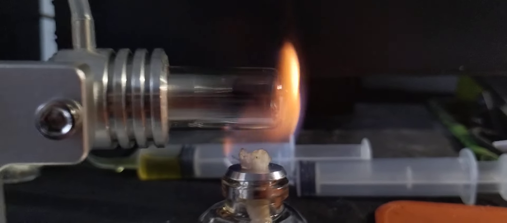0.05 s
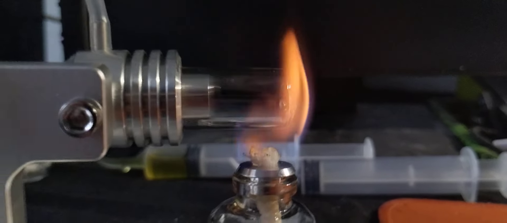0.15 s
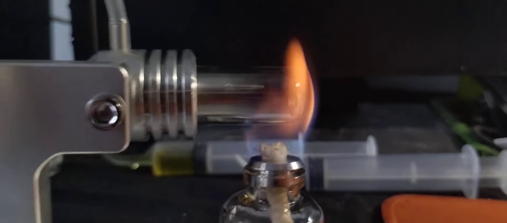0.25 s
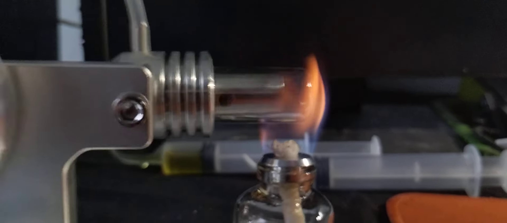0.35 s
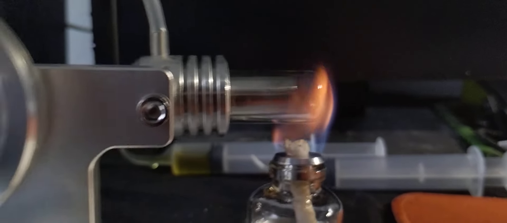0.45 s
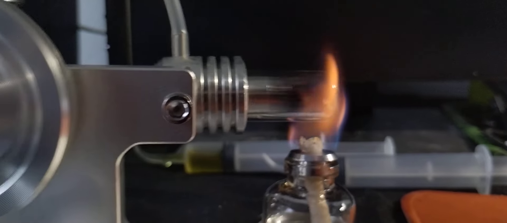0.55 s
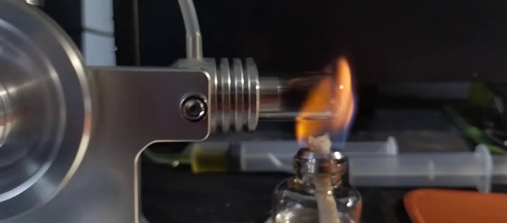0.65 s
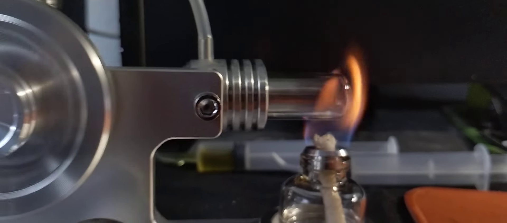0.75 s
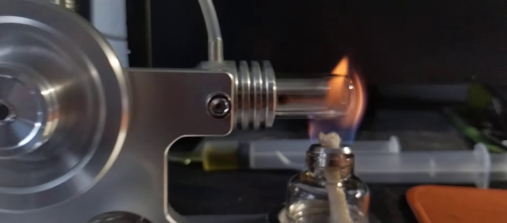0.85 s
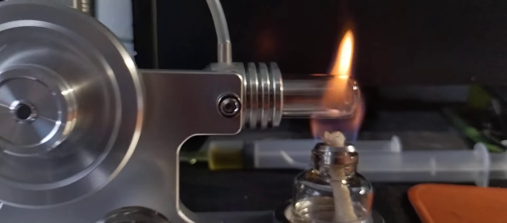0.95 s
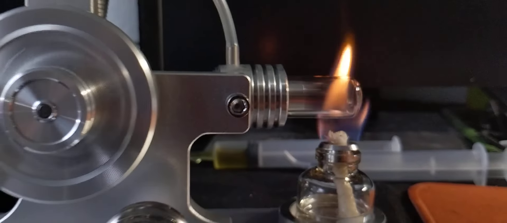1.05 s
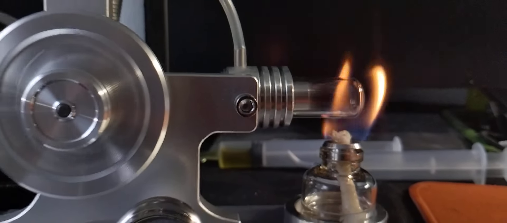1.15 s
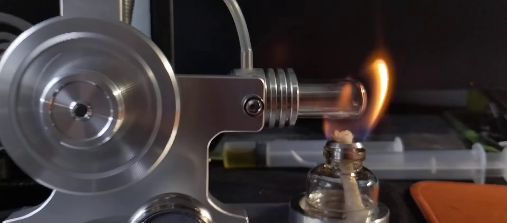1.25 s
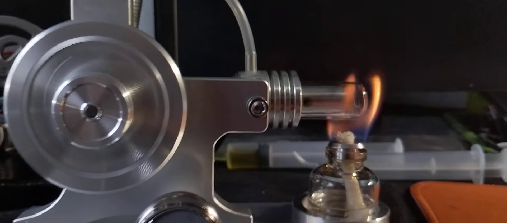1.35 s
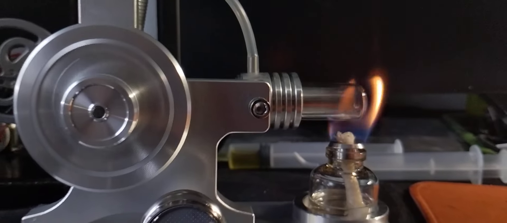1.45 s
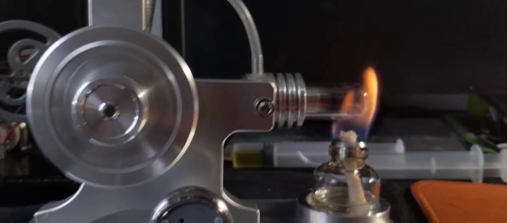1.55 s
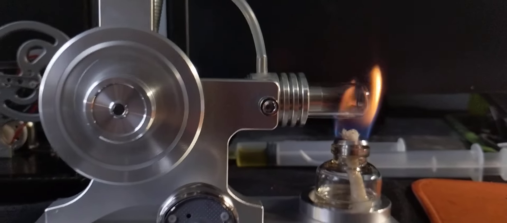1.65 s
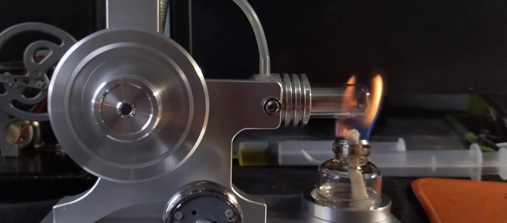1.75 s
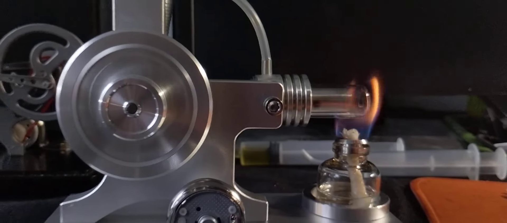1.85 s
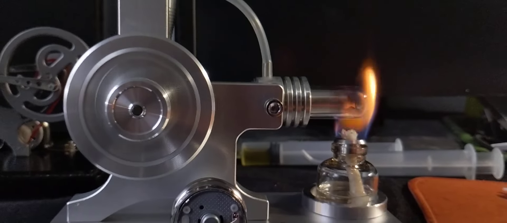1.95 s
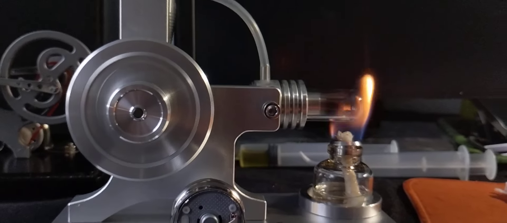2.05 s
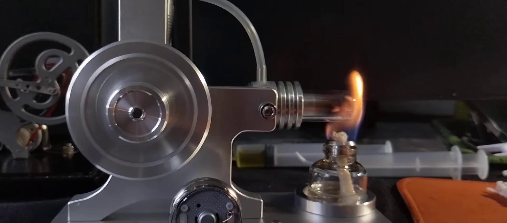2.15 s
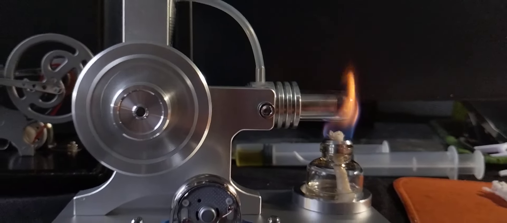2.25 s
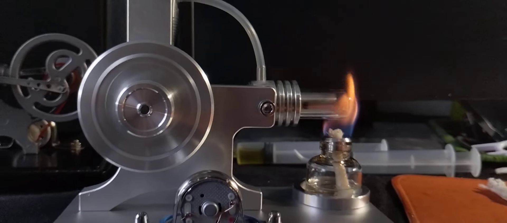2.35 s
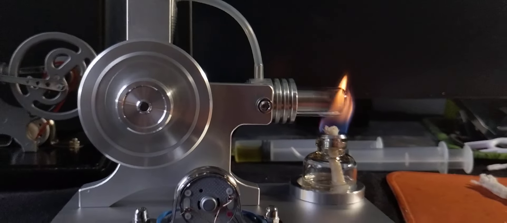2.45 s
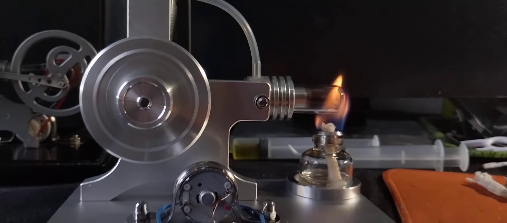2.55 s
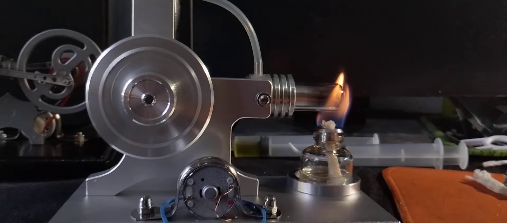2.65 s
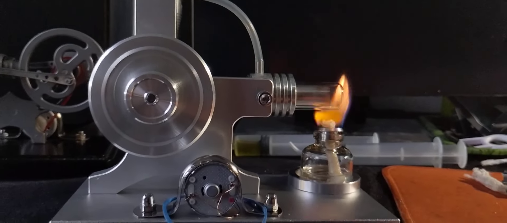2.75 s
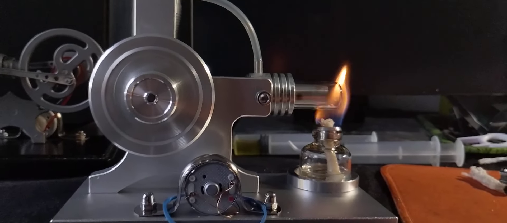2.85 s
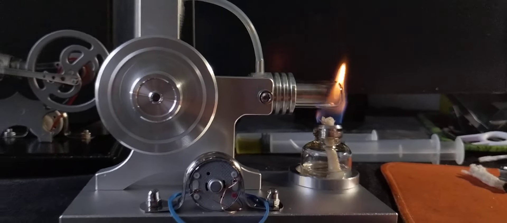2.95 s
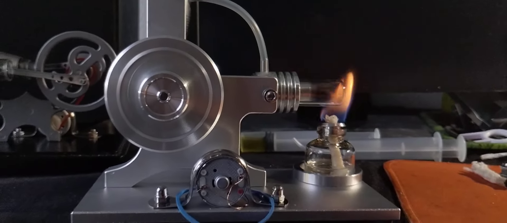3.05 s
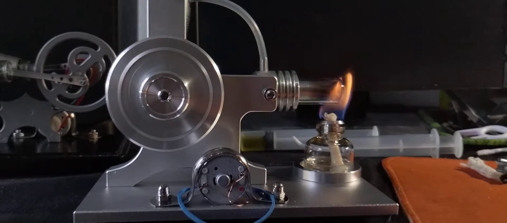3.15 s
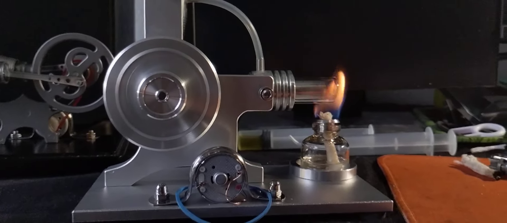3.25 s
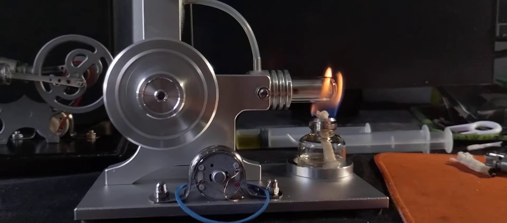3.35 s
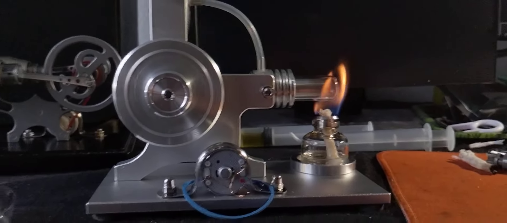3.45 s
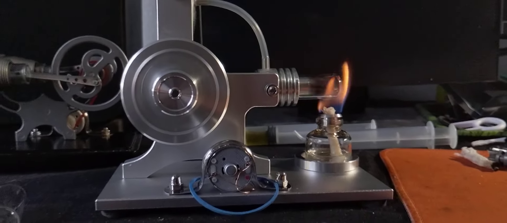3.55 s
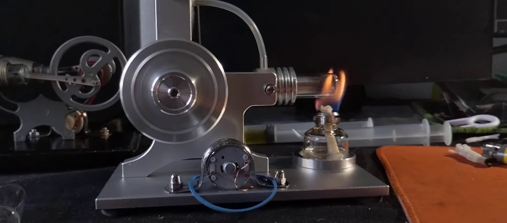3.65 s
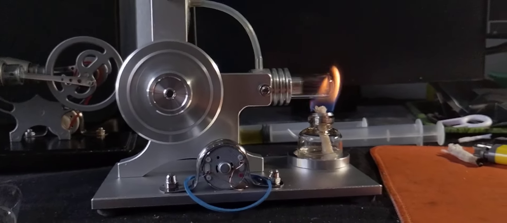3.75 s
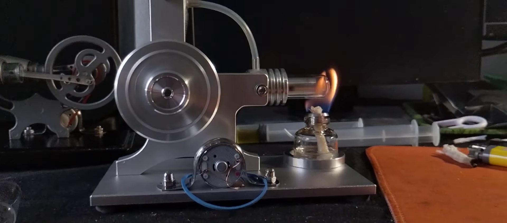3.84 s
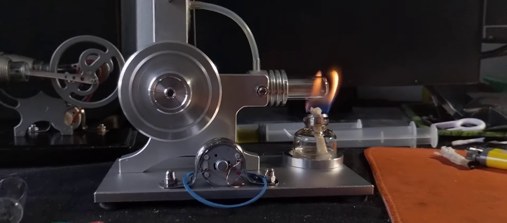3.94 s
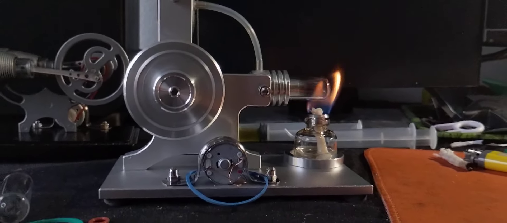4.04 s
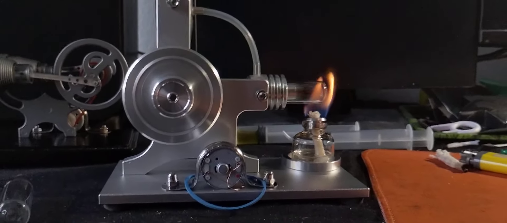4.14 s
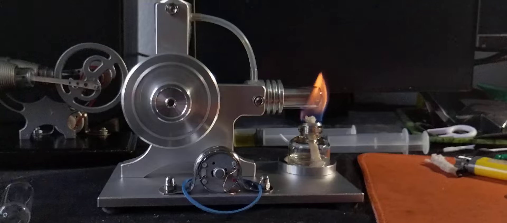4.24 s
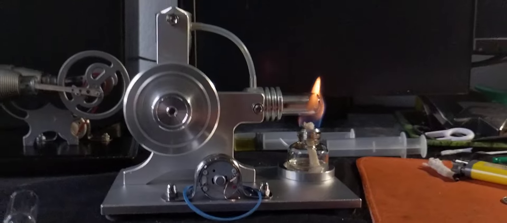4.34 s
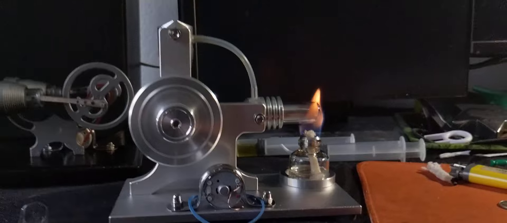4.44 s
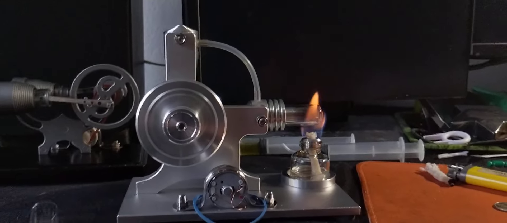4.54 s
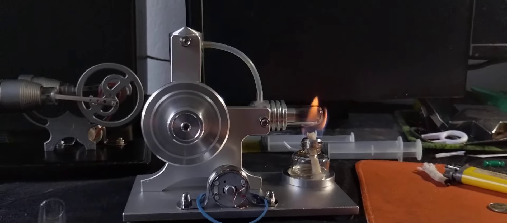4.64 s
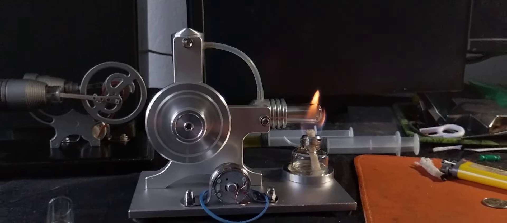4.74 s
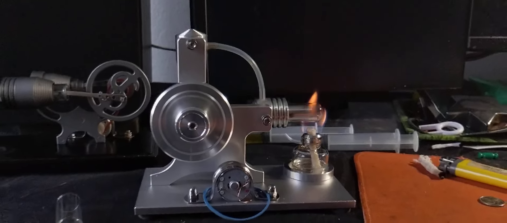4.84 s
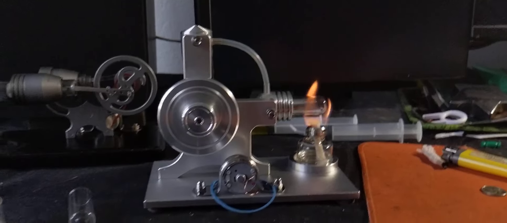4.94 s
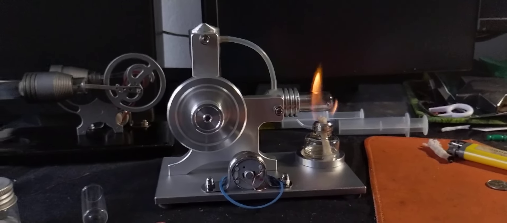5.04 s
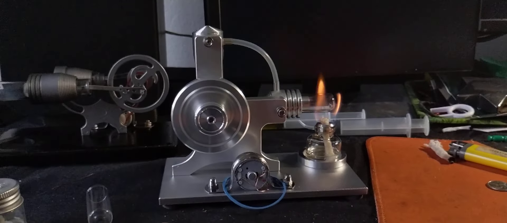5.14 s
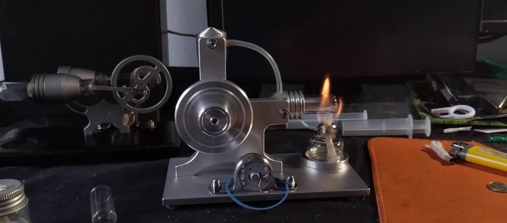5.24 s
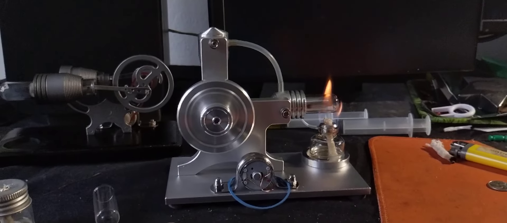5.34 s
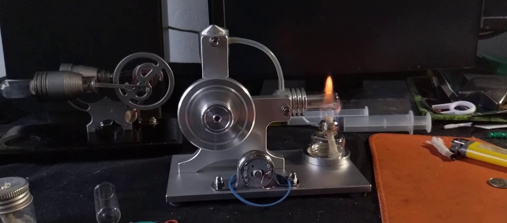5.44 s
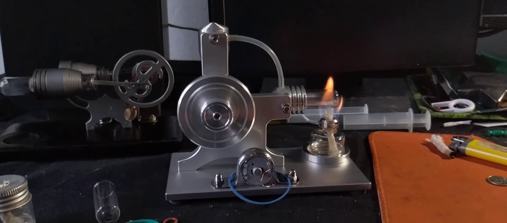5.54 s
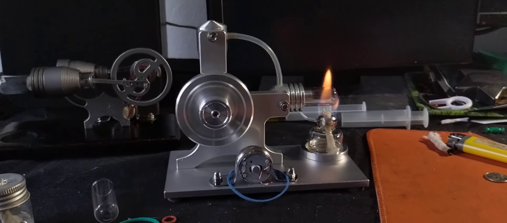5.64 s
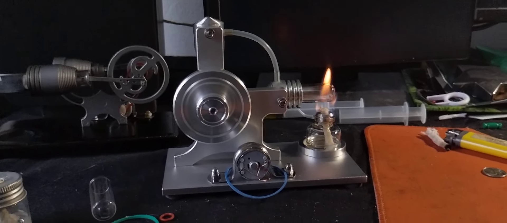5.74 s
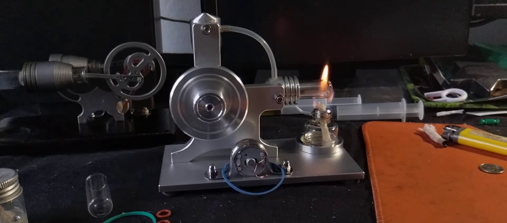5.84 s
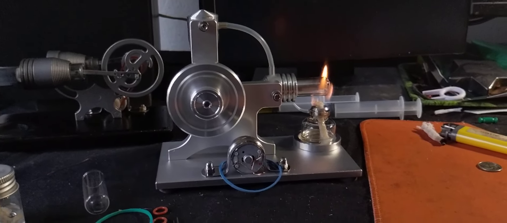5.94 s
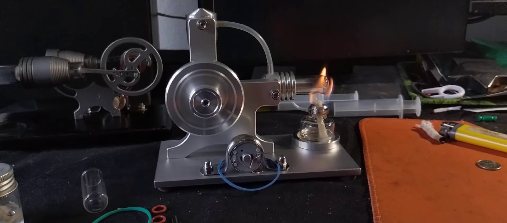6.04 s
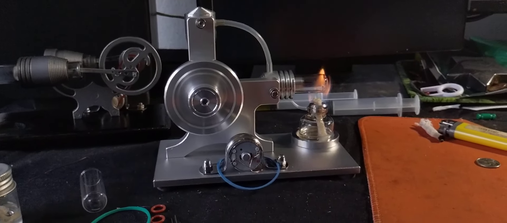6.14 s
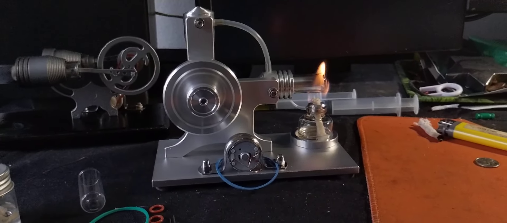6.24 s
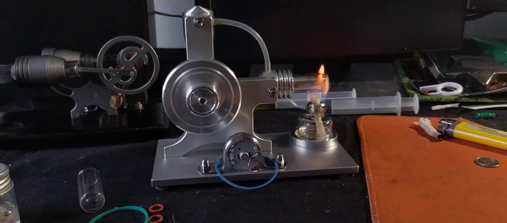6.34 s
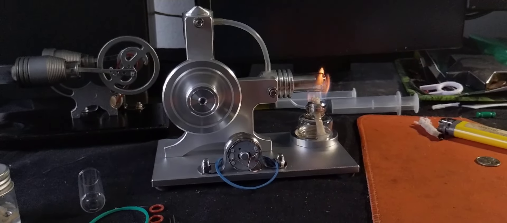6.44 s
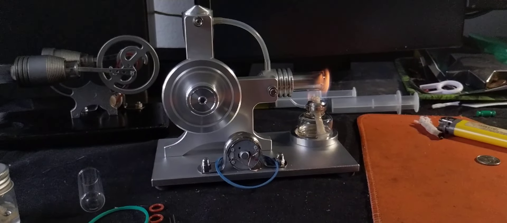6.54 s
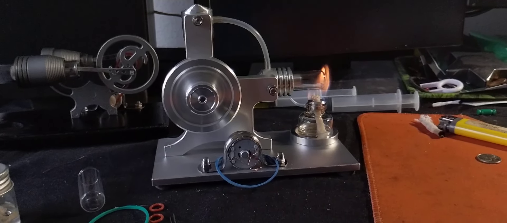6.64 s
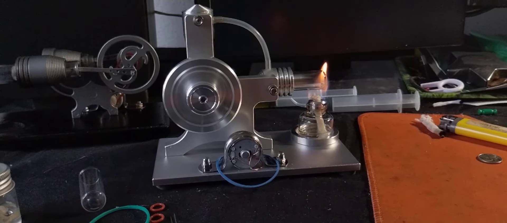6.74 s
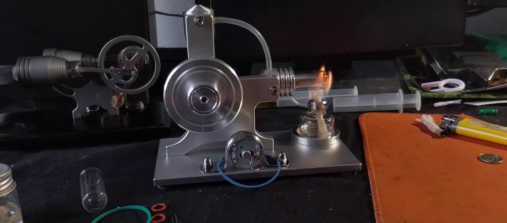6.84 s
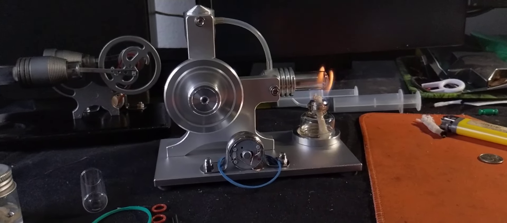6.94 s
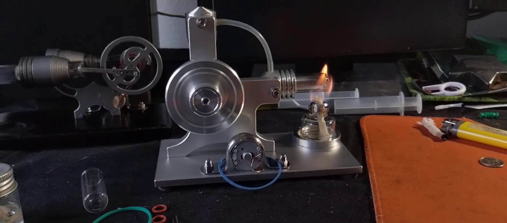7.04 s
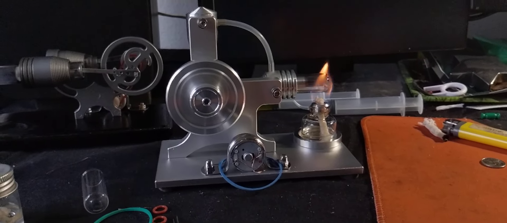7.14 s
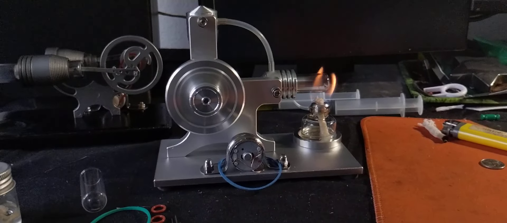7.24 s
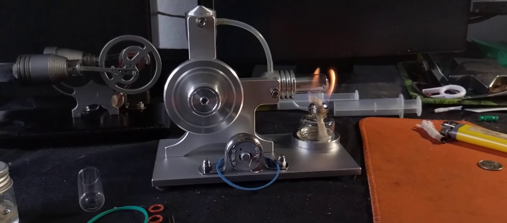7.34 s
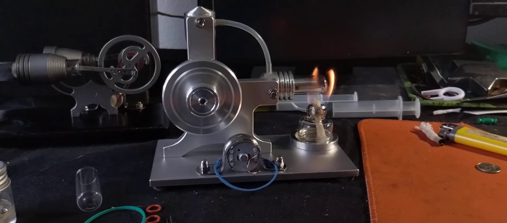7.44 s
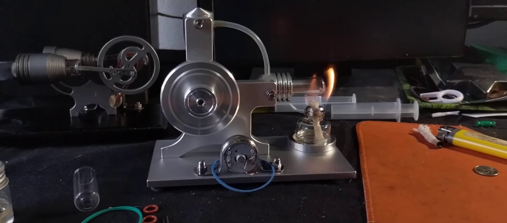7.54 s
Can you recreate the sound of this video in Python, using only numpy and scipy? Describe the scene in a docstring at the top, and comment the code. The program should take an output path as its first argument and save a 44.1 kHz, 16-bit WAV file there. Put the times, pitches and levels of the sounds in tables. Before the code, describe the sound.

Heard up close and to the left, a little hot-air engine runs at a constant quick pace, its metal parts ticking, scraping and ringing in a bright mechanical whir above a soft rumble. A few light slaps at the start lead to a brief spell of sharper rattling, then scattered clinks. As the microphone backs away in the small room, the running becomes a little quieter and more centred.

```python
"""A bench in a small room: a hot-air engine spins freely at 18 turns a second, while a pair of microphones
draws back from 12 to 34 cm. The play in its rods and pistons is taken up in a fixed pattern of knocks
every turn; they ring the metal frame, over sliding friction, the hum of the shaking base and a low rumble.
The rod slaps at first, and joints slam now and then, mostly in one rattling spell. The engine sits to
the left, and the right microphone is shaded from the treble."""
import sys
import numpy as np
from scipy import signal
from scipy.fft import rfft, irfft, next_fast_len
from scipy.io import wavfile
from scipy.ndimage import uniform_filter1d, minimum_filter1d, map_coordinates

SR = 44100
rng = np.random.default_rng(int(sys.argv[2]) if len(sys.argv) > 2 else 0)


def wrap_up_sound(samples):
    """Save the sound to the file named by the first command line argument, as 16-bit audio."""
    columns = np.atleast_2d(samples).T
    # keep every value between -1 and 1, then stretch to whole-number steps
    tamed = np.clip(columns, -1, 1)
    steps = np.round(tamed * 32767).astype(np.int16)
    wavfile.write(sys.argv[1], SR, steps)


N = 334719


def amp(db):
    """Decibels to gain."""
    return 10 ** (np.asarray(db) / 20)


def unit(x):
    """Scale to rms 1."""
    return x / np.sqrt(np.mean(x ** 2) + 1e-20)


def along(points, hz):
    """(Hz, value) points read on a log axis."""
    f, v = np.transpose(points)
    return np.interp(np.log(hz + 1), np.log(f + 1), v)


def curve(points):
    """(s, value) points read at every sample."""
    return np.interp(np.arange(N) / SR, *np.transpose(points))


def wobble(rate):
    """A smooth random curve, rate knots a second."""
    return map_coordinates(rng.standard_normal(int(N * rate / SR) + 4), [np.arange(N) * rate / SR])


def filtered(x, response):
    """x times a response of frequency."""
    n = x.shape[-1]
    m = next_fast_len(n + 8192, True)
    return irfft(rfft(x, m) * response(np.fft.rfftfreq(m, 1 / SR)), m)[..., :n]


def coloured(x, spectrum):
    """x with a broad colour, at rms 1."""
    return unit(filtered(x, lambda f: amp(along(spectrum, f))))


def rung(x, modes, order=1):
    """x through resonances (pitch_hz, width_hz, level_db), at rms 1; order 2 darkens the valleys."""
    def response(f):
        return sum((-1) ** k * amp(db) * 1j * f * width / (hz * hz - f * f + 1j * f * width)
                   for k, (hz, width, db) in enumerate(modes))
    return unit(filtered(x, lambda f: response(f) ** order))


def pair(alike, size=N):
    """White noise at two microphones that share a part of it."""
    shared = rng.standard_normal(size)
    return np.sqrt(alike) * shared + np.sqrt(1 - alike) * rng.standard_normal((2, size))


def panned(x, left_db):
    """Tip the balance to the left, keeping the sum."""
    share = 1 / (1 + amp(-left_db))
    return 2 * x * np.array([share, 1 - share]).reshape(2, -1)


# The microphones draw back from the engine, then all but rest: time_s, distance_m
MIC_PATH = [(0, .12), (.7, 0.13), (1.5, 0.16), (3, 0.22), (4.7, 0.32), (7.59, 0.34)]
def doublings(near_m=.12):
    """How many times the distance to the engine has doubled; called far below."""
    return np.log2(curve(MIC_PATH) / near_m)


def beamed(lobes, far, loss_db=7):
    """Level in dB of a strong mode: the microphones move through its lobes and lose it with distance."""
    return curve(lobes) - loss_db * far


# The flywheel's nearly steady speed: time_s, turns_per_s
FLYWHEEL_SPEED = [(0.0, 17.962), (1.0, 17.946), (2.0, 17.955), (2.8, 18.03), (3.8, 18.081), (4.5, 18.027),
                  (5.2, 18.045), (6.0, 18.073)]
def crank(start_turns=0.08106):
    """Turns of the flywheel so far."""
    return start_turns + np.cumsum(curve(FLYWHEEL_SPEED)) / SR


# The contacts of one turn and their relative force on each part: place_turns, scatter_turns, chatter_s,
# ping_db, thin_db, wheel_db, clack_db, frame_db, bracket_db, plate_db
TURN_KNOCKS = [(.048, .005, .0017, 0, 0, 0, -5, -3, -7, 0), (.115, .014, .003, -4, -7, -5, -4, -2, -8, -4),
               (.255, .02, .003, -11, -12, -15, -9, -10, -7, -11),
               (.33, .006, .002, -12, -8, -11, -10, -9, -12, -7),
               (.365, .012, .003, -12, -13, -12, -11, -8, -14, -8),
               (.51, .008, .002, -26, -20, -24, -20, -20, -7, -22),
               (.622, .005, .0017, -1, -6, -14, 0, 0, -8, -4),
               (.695, .016, .003, -5, -8, -9, -7, -7, -6, -6),
               (.835, .005, .0016, -1, -3, 0, -9, -5, -1, -7),
               (.87, .012, .0025, -14, -11, -12, -6, -1, -1, -7)]
def knock_power(turns, force_db=1.3, bright_db=1.6, rise_s=.0005):
    """Each contact comes once a turn, a little early or late, and chatters: power into seven parts."""
    power, t = np.zeros((7, N + SR)), np.arange(SR // 40) / SR
    whole = np.arange(int(turns[-1]) + 1)
    for place, scatter, chatter_s, *part_db in TURN_KNOCKS:
        late, hard, bright = np.clip(rng.standard_normal((3, len(whole))), -2, 2)
        starts = np.searchsorted(turns, whole + place + scatter * late)
        samples = (starts[:, None] + np.arange(len(t))).ravel()
        burst = (np.exp(-t / chatter_s) * (1 - np.exp(-t / rise_s))) ** 2
        burst /= burst.sum()
        train = lambda db: np.bincount(samples, np.outer(amp(db) ** 2, burst).ravel(), N + SR)
        # the ping depends more than the rest on how squarely the metal meets
        power[0] += amp(part_db[0]) ** 2 * train(force_db * hard + bright_db * bright)
        power[1:] += amp(part_db[1:])[:, None] ** 2 * train(force_db * hard)
    return power[:, :N] / power[:, :N].mean(axis=1, keepdims=True)


def drive(power, slide_db, alike):
    """Chattering contacts on top of steady sliding friction."""
    return np.sqrt(power + amp(slide_db) ** 2) * pair(alike)


def chime(power, hz, damping_hz, blur_hz, skirt_hz=420):
    """One clean mode, topped up by every knock: it dies away between knocks, and each nudges its phase."""
    energy = signal.lfilter([1], [1, -np.exp(-2 * np.pi * damping_hz / SR)], power)
    nudges = np.sqrt(2 * np.pi * blur_hz * power / SR) * rng.standard_normal(N)
    phase = 2 * np.pi * hz * np.arange(N) / SR + uniform_filter1d(np.cumsum(nudges), 40)
    mic_drift = np.array([wobble(14), wobble(14)])
    return rung(np.sqrt(energy) * np.sin(phase + mic_drift), [(hz, skirt_hz, 0)])


PING_HZ, CLACK_HZ, LINK_HZ, ROD_HZ = 8815, 4265, 3915, 3468

# The clack's lobes along the microphones' path: time_s, level_db
CLACK_LOBES = [(0, -47), (1, -40), (2, -35), (2.7, -35), (4.3, -35), (5.3, -40)]
# Resonances of the thin links: pitch_hz, width_hz, level_db
THIN_LINK_MODES = [(5463, 230, 5), (5920, 190, 1), (6250, 350, 2), (6960, 200, 0.5)]
# The colour of bare metal contact: pitch_hz, level_db
CONTACT_COLOUR = [(1500, -39), (2950, -15), (3300, -3.5), (3900, -5.5), (4400, -6), (4950, -6.5),
                  (5450, -2), (6000, -3.5), (6600, -8.5), (8000, -25), (11000, -30)]
def link_clatter(clack, ticks, scrape, far):
    """The joints clack, the thin links tick and bare metal scrapes."""
    level_db = -35 - 7 * far
    out = amp(beamed(CLACK_LOBES, far)) * chime(clack, CLACK_HZ, damping_hz=150, blur_hz=110)
    out += amp(level_db + 1.5) * rung(ticks, THIN_LINK_MODES)
    return out + amp(level_db - 3.5) * coloured(scrape, CONTACT_COLOUR)


# Lobes of the frame, link, wheel, post and treble modes along the microphones' path: time_s, level_db
FRAME_LOBES = [(0, -37), (.5, -37), (.95, -31), (1.8, -26.5), (2.2, -27), (3.3, -31.5), (4.5, -32.5),
               (7.59, -31)]
LINK_LOBES = [(0, -49), (.5, -39), (1.2, -38.5), (1.7, -40), (2.9, -34.5), (3.5, -35.5), (4.4, -37),
              (5.3, -50), (6.4, -47)]
WHEEL_LOBES = [(.3, -28.5), (1.9, -43), (2.6, -30), (4.7, -40.5), (7.59, -30)]
POST_LOBES = [(0, -39), (.5, -43), (1.8, -42.5), (3.3, -67), (4.6, -35), (5.2, -34.5), (7.59, -37)]
TREBLE_LOBES = [(0, -35), (.65, -26), (1.5, -37.5), (3, -37), (5.9, -48), (7.59, -32)]
# The metal's treble resonances: pitch_hz, width_hz, level_db
TREBLE_MODES = [(6710, 110, -8), (7450, 330, -5), (7830, 90, 3.5), (8540, 90, 4.5)]
def metal_rings(frame, clack, wheel, ticks, far):
    """The knocks ring the frame, link, wheel and post; each swells and fades as its lobes pass."""
    out = amp(beamed(FRAME_LOBES, far)) * chime(frame, hz=4462, damping_hz=60, blur_hz=48)
    out += amp(beamed(LINK_LOBES, far)) * chime(clack, LINK_HZ, damping_hz=190, blur_hz=150)
    out += amp(beamed(WHEEL_LOBES, far)) * chime(wheel, hz=6305, damping_hz=110, blur_hz=90)
    out += amp(beamed(TREBLE_LOBES, far)) * rung(ticks, TREBLE_MODES)
    return out + amp(beamed(POST_LOBES, far) - 4.5) * rung(ticks, [(4740, 280, 0)], order=2)


# Resonances of the smallest parts: pitch_hz, width_hz, level_db
PIN_MODES = [(9720, 150, 1), (11450, 140, -9.5), (12700, 89, -5.5), (13100, 140, -23)]
# The colour of rubbing metal: pitch_hz, level_db
RUB_COLOUR = [(3000, -34), (4950, -16), (5900, -13), (7500, -1), (8600, 0), (9300, -1), (10300, -0.5),
              (11100, -12), (12500, -6), (14200, -11)]
# The fizz at the left microphone over the right: time_s, left_db
FIZZ_BALANCE = [(1.2, 17), (3.5, 9.5), (6.5, 4.5)]
def friction_fizz(ticks, scrape, far):
    """Ticking pins and rubbing metal make the top treble, which drifts towards the centre."""
    level_db = -33.5 - 8 * far
    pins = amp(level_db - 3.0) * rung(ticks, PIN_MODES)
    rub = amp(level_db + 2.16) * coloured(scrape, RUB_COLOUR)
    return panned(pins + rub, curve(FIZZ_BALANCE))


# The rod's lobes along the microphones' path: time_s, level_db
ROD_LOBES = [(.2, -31.5), (.5, -39), (1, -41), (1.6, -43), (2.4, -38), (2.9, -37), (3.6, -34), (4.3, -40),
             (5.2, -39), (7.59, -38)]
def rod_ring(power, far):
    """The knocks keep the rod ringing on one note."""
    return amp(beamed(ROD_LOBES, far)) * chime(power, ROD_HZ, damping_hz=95, blur_hz=85)


# Lobes of the high ping and the bracket along the microphones' path: time_s, level_db
PING_LOBES = [(0, -41), (1, -30.5), (1.7, -27.5), (2.6, -27.5), (3.4, -31.5), (4.2, -28), (4.6, -45.5),
              (4.9, -40), (5.6, -25), (6.1, -29), (7.1, -24), (7.59, -24.5)]
BRACKET_LOBES = [(0, -55), (2.5, -45), (4.1, -42.5), (4.55, -32.5), (5.6, -33), (7.59, -34.5)]
def ping_and_bracket(ping, bracket, far):
    """Metal meeting squarely pings; the bracket shares in the ping and rings its own lower note."""
    ping_db, bracket_db = beamed(PING_LOBES, far), beamed(BRACKET_LOBES, far)
    high = amp(ping_db + 3.2) * chime(ping, PING_HZ, damping_hz=48, blur_hz=30, skirt_hz=700)
    chatter = drive(ping, slide_db=-13.5, alike=0.15)
    high += amp((ping_db + bracket_db) / 2 + 4.0) * rung(chatter, [(9065, 200, 0)])
    low = amp(bracket_db) * chime(bracket, hz=2118, damping_hz=42, blur_hz=34)
    return panned(high, left_db=13) + panned(low, left_db=14)


def shoves(turns):
    """The load reversals push the base alike in every turn, to and fro, which makes a fine buzz."""
    pulses, whole = np.zeros(N + 1), np.arange(int(turns[-1]) + 1)
    for k, (place, *_, plate_db) in enumerate(TURN_KNOCKS):
        pulses[np.searchsorted(turns, whole + place)] = (-1) ** k * amp(plate_db)
    colour = [(200, -20), (400, -7), (700, 0), (1200, -2),
              (2000, 3.5), (2600, -5), (2950, -24), (8000, -60)]
    return coloured(pulses[:N], colour)


# The colour of the knocked base plate: pitch_hz, level_db
PLATE_COLOUR = [(150, -6), (300, -9.5), (410, 0.5), (540, -1.5), (660, -1.5), (800, 0), (1130, 2),
                (1350, -1.5), (1650, -2), (2000, 5), (2380, 1.5), (2620, 4), (2900, -11), (3400, -14),
                (6000, -32)]
def base_plate(bracket, plate, turns, far, left_db):
    """The knocks thud in the base plate, and the rocking bracket rings it."""
    level_db = -40 - 5 * far
    rocking = drive(bracket, slide_db=-10, alike=0.43)
    ring = amp(level_db - 5) * rung(rocking, [(2020, 170, 0), (2620, 240, -5)], order=2)
    knocking = coloured(drive(plate, slide_db=1.5, alike=0.54), PLATE_COLOUR)
    thud = amp(level_db) * (knocking + amp(-11) * shoves(turns))
    return panned(ring, left_db=1.5) + panned(thud, left_db - 2)


def linkage(turns, far, left_db):
    """The knocks and friction of rods and pistons, sounding through every part they drive."""
    ping, thin, wheel, clack, frame, bracket, plate = knock_power(turns)
    ticks = drive(thin, slide_db=-11, alike=0.45)
    scrape = drive(thin, slide_db=-1, alike=0.099)
    return (panned(link_clatter(clack, ticks, scrape, far), left_db - 5)
            + panned(metal_rings(frame, clack, wheel, ticks, far), left_db + 5)
            + friction_fizz(ticks, scrape, far)
            + panned(rod_ring((frame + bracket) / 2, far), 2.1 * left_db - 10)
            + ping_and_bracket(ping, bracket, far)
            + base_plate(bracket, plate, turns, far, left_db))


def orders(turns, table, waver_db):
    """Slightly unsteady tones at multiples of the turning speed."""
    tones = (amp(db + waver_db * wobble(5.6)) * np.sin(2 * np.pi * (round(k) * turns + rng.random()))
             for k, db in table)
    return unit(sum(tones))


# Tones of the shaken bench and of the humming base: cycles_per_turn, level_db
BENCH_TONES = [(4, -8.5), (5, -8), (6, 2), (7, -20), (9, -3), (10, -22)]
BASE_TONES = [(13, -6.5), (14, -11), (15, 3), (16, -5.5), (17, -4.5), (18, -11), (21, -11.5), (23, -12.5),
              (37, -16)]
# The colour of the low rumble: pitch_hz, level_db
RUMBLE_COLOUR = [(20, -32), (45, -8), (70, -6), (110, 3), (165, 0.5), (220, -3), (300, -9.5), (400, -20.5),
                 (900, -19.5)]
# The rumble swells twice: time_s, gain_db
RUMBLE_SWELLS = [(0, -2), (.55, 3.5), (.77, 6), (1, -0.5), (3.1, -1), (3.6, -1), (4.1, 1.5), (5.1, -0.5),
                 (7.59, 0)]
def bench(turns, far, left_db):
    """The unbalanced engine shakes its base and the bench, over a low rumble."""
    rumble_db, hum_db = -40.5 - 6.5 * far, -41 - 12 * far
    shake = amp(rumble_db - 7) * orders(turns, BENCH_TONES, waver_db=-1.5)
    hum = amp(hum_db) * orders(turns, BASE_TONES, waver_db=1.2)
    rumble = amp(rumble_db + curve(RUMBLE_SWELLS)) * coloured(pair(0.77), RUMBLE_COLOUR)
    return panned(shake + rumble, left_db - 3.5) + panned(hum, left_db + 3)


# The rod slaps in its bearing, close up and hard left: start_s, level_db
BEARING_SLAPS = [(.043, -17), (.098, -17), (.153, -13), (.265, -16)]
def rod_slaps(rise_s=0.0012, decay_s=0.0048):
    """A slap gives one short, clean ping of the rod."""
    out, t = np.zeros(N + SR), np.arange(SR // 20) / SR
    shape = (1 - np.exp(-t / rise_s)) * np.exp(-t / decay_s)
    ping = shape / shape.max() * np.sin(2 * np.pi * ROD_HZ * t)
    for start_s, level_db in BEARING_SLAPS:
        out[round(start_s * SR):][:len(t)] += amp(level_db - 1) * ping
    return panned(out[:N], left_db=22)


# The hardest knocks, thickest from 1.2 to 2.2 s; levels relative: start_s, ping_db, contact_s, crack_db
JOINT_SLAMS = [(0.5548, -22, .003, -13), (0.766, -13, .003, -12), (0.9777, -12, 0.0065, -11.5),
               (0.99, -15, .002, -14), (1.2232, -7, .005, -15), (1.279, -3, 0.0042, -13),
               (1.3115, -8, .005, -12), (1.324, -8, .003, -11), (1.367, -6.5, 0.0074, -22),
               (1.3905, -11, .008, -15), (1.4235, -7.5, .005, -16), (1.446, -10, 0.0055, -28),
               (1.5357, -12.5, 0.012, -12), (1.594, -6.5, 0.0065, -17), (1.6121, -13, 0.01, -14),
               (1.6458, -13, .004, -20), (1.67, -4, 0.0055, -18), (1.7014, -8, .004, -17),
               (1.726, -6, 0.011, -18), (1.7562, -10, 0.005, -17), (1.7684, -1, 0.0025, -13),
               (1.7804, -8, 0.0073, -13), (1.813, -5, 0.0056, -17), (1.8366, -11, .007, -24),
               (1.867, -3, .006, -21), (1.8925, -1.5, .009, -16), (1.9803, -3, 0.0057, -8),
               (2.004, -7, .004, -17), (2.0352, -5, 0.0046, -17), (2.0587, -5.5, 0.0086, -22),
               (2.1027, -6.5, .005, -15), (2.1473, -8.5, .006, -14.5), (2.2016, -9, .004, -11.5),
               (2.2267, -9.5, 0.01, -17), (2.4484, -13, 0.009, -14), (2.837, -9.5, .003, -24),
               (2.936, -10, .002, -25), (3.28, -12.5, 0.0081, -23), (3.3124, -12.5, .006, -16),
               (3.4783, -13, .005, -18), (3.7782, -16, .002, -18), (3.8107, -10.5, 0.0029, -16),
               (3.9753, -13, 0.0067, -29), (4.0321, -15, .008, -22), (4.0551, -15, .003, -25),
               (4.2533, -15, .003, -18), (4.3875, -18, .004, -16), (4.4754, -23, .003, -21),
               (5.1604, -15, 0.0057, -17.5), (5.263, -16, 0.0025, -24), (5.5958, -11, .003, -22),
               (5.607, -14, .003, -30), (5.658, -15, 0.012, -30), (5.7149, -12.5, 0.0067, -34),
               (5.983, -16, .002, -29), (5.9947, -16, 0.0022, -24), (6.3029, -13, .003, -23),
               (6.326, -11, 0.0033, -27), (6.382, -14, .002, -36), (6.437, -12.5, .004, -27),
               (6.4922, -13, .003, -28), (6.647, -14, 0.0028, -18), (7.0898, -12, 0.006, -24),
               (7.1507, -10.5, 0.012, -20)]
def joint_slams(swell_s=0.00066, release_s=0.0014, crack_s=0.0064, shoulder_hz=8650):
    """A joint slams and grinds: a crack, then the ping swells while the contact lasts and is damped."""
    out, t = np.zeros((2, N + SR)), np.arange(SR // 30) / SR
    for start_s, ping_db, contact_s, crack_db in JOINT_SLAMS:
        shape = (1 - np.exp(-t / swell_s)) * np.exp(-t / (2 * contact_s))
        shape /= 1 + np.exp(np.minimum((t - contact_s) / release_s, 20))
        tone = np.sin(2 * np.pi * (PING_HZ + 15 * rng.standard_normal()) * t)
        tone += amp(-15) * np.sin(2 * np.pi * (shoulder_hz * t + rng.random()))
        ping = amp(ping_db - 5) * shape / shape.max() * tone
        noise = pair(0.47, size=len(t))
        clack = rung(noise, [(LINK_HZ, 220, -2), (CLACK_HZ, 220, 0)], order=2)
        grit = unit(coloured(noise, CONTACT_COLOUR) + 0.51 * rung(noise, PIN_MODES) + .6 * clack)
        crack = amp(crack_db - 9) * np.exp(-t / crack_s) * grit
        out[:, round(start_s * SR):][:, :len(t)] += ping + crack
    return panned(out[:, :N], left_db=16)


# How long the room around the bench rings: pitch_hz, t60_s
ROOM_DECAY = [(200, .1), (2000, .2), (10000, .11)]
def room(x):
    """A small room; the middle range outlasts the bass and treble."""
    hz, t, noise = signal.stft(rng.standard_normal((2, SR // 3)), SR, nperseg=256)
    tail = signal.istft(noise * amp(-60 * t / along(ROOM_DECAY, hz)[:, None]), SR, nperseg=256)[1]
    return signal.fftconvolve(x, tail / np.linalg.norm(tail[0]), axes=1)[:, :N]


def scene():
    """The engine on its bench: softer, more central and more blended with the room as we draw back."""
    turns, far = crank(), doublings()
    left_db, wet_db = 10.5 - 2.5 * far, -12.5 + 5 * far
    clatter = linkage(turns, far, left_db) + joint_slams() + rod_slaps()
    engine = clatter + bench(turns, far, left_db)
    lead_s = .00016  # the sound reaches the left microphone first
    direct = filtered(engine, lambda f: np.exp(1j * np.pi * lead_s * np.outer([1, -1], f)))
    return direct + room(amp(wet_db) * clatter)


def limited(x, ceiling=.78, size=90):
    """A quick limiter holds down the hardest peaks."""
    needed = np.minimum(1, ceiling / (np.abs(x).max(axis=0) + 1e-9))
    return x * uniform_filter1d(minimum_filter1d(needed, 2 * size), size)


# The right microphone's response, shaded from the treble: pitch_hz, gain_db
RIGHT_MIC = [(3000, 4.5), (6300, 2), (7200, 2), (7900, -6), (8500, -5.5), (9200, -15), (11000, -22),
             (14000, -10.5)]
def record(dry):
    """The right microphone is dull; peaks are limited and nothing is kept above the band limit."""
    top_hz = 14300
    shaded = filtered(dry, lambda f: np.array([np.ones_like(f), amp(along(RIGHT_MIC, f))]))
    return filtered(limited(shaded), lambda f: 1 / np.sqrt(1 + (f / top_hz) ** 500))


dry = scene()
out = record(dry)
wrap_up_sound(out)
```